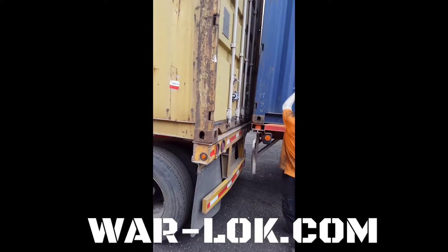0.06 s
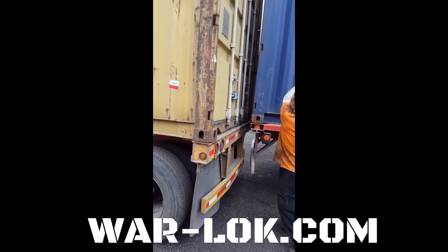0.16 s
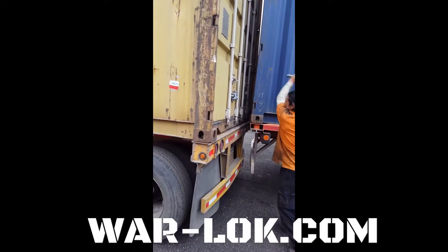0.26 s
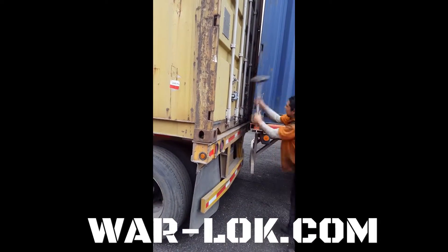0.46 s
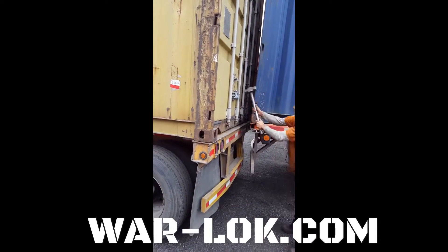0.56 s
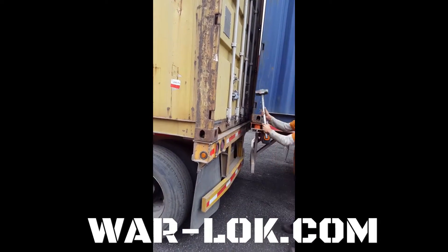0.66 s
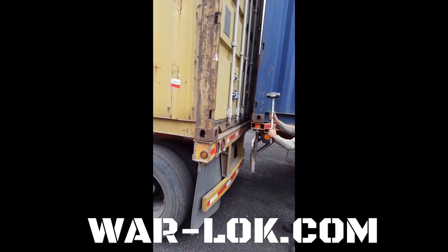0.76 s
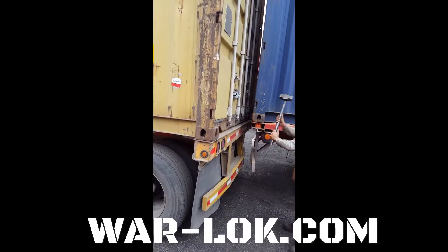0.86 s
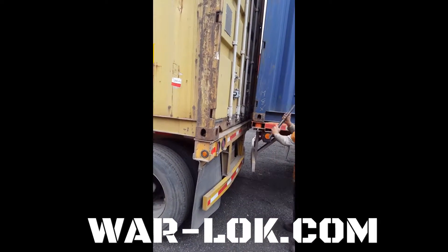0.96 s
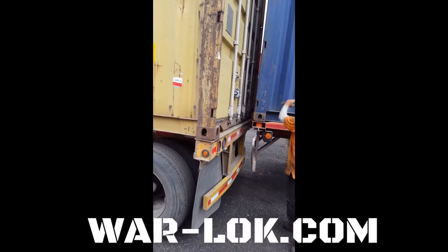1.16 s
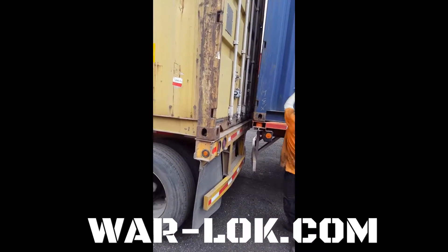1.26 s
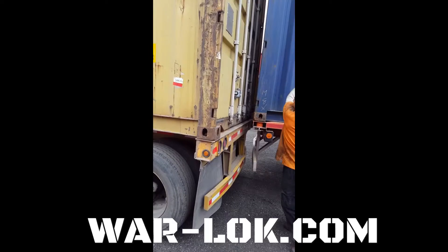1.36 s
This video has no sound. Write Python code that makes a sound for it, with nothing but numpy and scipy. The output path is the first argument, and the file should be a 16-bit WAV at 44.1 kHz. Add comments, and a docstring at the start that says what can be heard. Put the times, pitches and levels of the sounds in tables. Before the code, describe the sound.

A sledgehammer hits a steel container door once, a loud ringing clang over an idling engine.

```python
"""A container yard, a diesel engine idling. A sledgehammer hits the steel lock box on a door, once.
The box cracks and clangs, the door booms and rings behind it, and the container walls throw back a tail.
Faint scuffs of shoes and clothing and two thin steel squeaks sit around the swing.
The blow overloads the recorder, which clips and briefly ducks its gain."""
import sys
import numpy as np
from scipy import signal
from scipy.fft import rfft, irfft, next_fast_len
from scipy.io import wavfile

SR = 44100
rng = np.random.default_rng(int(sys.argv[2]) if len(sys.argv) > 2 else 0)


def log_audio(samples):
    """Write samples as a 16-bit WAV file to the path given in sys.argv[1]."""
    # one column per channel
    frames = np.atleast_2d(samples).T
    # limit to full scale, then quantise
    limited = np.clip(frames, -1, 1)
    pcm = np.round(limited * 32767).astype(np.int16)
    wavfile.write(sys.argv[1], SR, pcm)


N = 61739
BLOW_S = 0.6075  # the hammer lands

# Tone colour of the lock box's clang: f/Hz, relative level/dB
CLANG_COLOUR = [(100, -39), (400, -8.5), (900, -4), (2000, -3), (3000, -9), (4200, -13.5), (7000, -11),
                (9500, -17.5), (11500, -25.5), (15500, -22.5)]
# Decay of the clang: f/Hz, t60/s
CLANG_DECAY = [(300, 0.65), (2000, 0.33), (7000, 0.25), (15000, 0.28)]
# Stereo image of the clang: f/Hz, left-right correlation
CLANG_IMAGE = [(200, 0.22), (640, 0.0021), (1400, -0.6), (3100, -0.3), (12000, 0.039)]
# Tone colour of the door's boom: f/Hz, relative level/dB
BOOM_COLOUR = [(60, -40.5), (150, -22), (240, -0.5), (330, -9), (460, 1.5), (620, -9), (700, -11),
               (850, -8), (1300, -17.5), (3000, -24.5), (9000, -58)]
# Slapback of the boom off nearby containers: delay/s, level/dB, t60/s
SLAPBACKS = [(.057, -14, .25), (0.214, -20, 0.2)]
# Ringing modes of door and box: f/Hz, level/dB, t60/s
STEEL_MODES = [(257, -14.5, 0.66), (296, -21, 0.18), (339.6, -20, 1.3), (402, -20.5, 0.42),
               (458.8, -9, .55), (537.6, -13, 0.81), (554, -16, 0.39), (620, -20.5, 0.31), (752, -14.5, 1),
               (871.5, -16, 0.5), (1062, -23, 1.6), (1218, -34, 3), (1948, -30.5, 1.3), (2953, -20.5, 0.52),
               (8000, -27, .6)]
# Tone colour of the tail from the container walls: f/Hz, relative level/dB
TAIL_COLOUR = [(80, -29.5), (250, -5), (550, 1.5), (850, -6.5), (1250, -7), (1500, -12), (2300, -13),
               (3800, -23.5), (6000, -24), (7500, -24.5), (7750, -18), (8000, -21.5), (10500, -31),
               (13500, -42.5), (15500, -55)]
# Decay of that tail: f/Hz, t60/s
TAIL_DECAY = [(200, 1.4), (600, 1.16), (1200, 1.35), (2200, 0.82), (4000, 0.82), (8000, 0.64),
              (14000, 0.32)]
# Stereo image of distant sound: f/Hz, left-right correlation
FAR_IMAGE = [(60, .96), (130, 0.97), (290, 0.91), (640, 0.64), (1400, 0.022), (3100, 0.15), (12000, 0.078)]
# Pan of the whole blow: f/Hz, left minus right level/dB
BLOW_PAN = [(200, 1.5), (1200, -0.5), (2200, -1), (4500, 1.5), (8000, 1.5), (13000, 2.5)]
# Level of the engine as heard, its rumble ducked by the recorder just after the blow:
# t/s, relative rumble level/dB, relative clatter level/dB
ENGINE_LEVELS = [(0, -30.5, -35.5), (.11, -32, -38), (.21, -25, -36.5), (.34, -25, -35), (.48, -21, -34),
                 (.6, -24, -36), (.7, -28.5, -34), (.85, -25, -36), (.97, -23.5, -34), (1.1, -23.5, -36),
                 (1.25, -29, -38.5), (1.4, -29, -37.5)]
# Tone colour of the engine's low rumble: f/Hz, relative level/dB
RUMBLE_COLOUR = [(20, -35), (35, -23.5), (57, 0.5), (75, -5), (110, -0.5), (170, 3), (250, 4.5),
                 (330, -6.5), (450, -9), (900, -72.5)]
# Tone colour of the engine's midrange clatter: f/Hz, relative level/dB
CLATTER_COLOUR = [(150, -33), (300, 0), (410, -2.5), (600, -3.5), (900, -12.5), (1200, -17), (1600, -27.5),
                  (2400, -34), (3600, -46), (6000, -55), (9000, -65), (11000, -65.5), (15500, -61)]
# Scuffs around the swing: t/s, level/dB, t60/s
SCUFF_CUES = [(.212, -65.5, .15), (.413, -60, 0.35), (1.288, -64, 0.16)]
# Tone colour of a scuff: f/Hz, relative level/dB
SCUFF_COLOUR = [(2000, -10), (4500, 1.5), (6500, -9), (8300, 0), (9800, -3.5), (11000, -15.5),
                (15000, -21.5)]
# Steel squeaks before the blow: t/s, length/s, f/Hz, level/dB
SQUEAK_CUES = [(.26, 0.29, 2950, -69.5), (0.5, 0.06, 4180, -70)]


def lock_box():
    """The attack: a bright steel-on-steel crack over the box's crowded, quickly damped modes."""
    crack_hz, width_octaves = 7240, 1
    clang = amp(-0.5) * damped(noise(CLANG_COLOUR, CLANG_IMAGE), CLANG_DECAY)
    sizzle = bell_noise(lambda hz: np.log2((hz + 1) / crack_hz) / width_octaves)
    crack = amp(-3) * sizzle * fall(since(BLOW_S), t60=0.022)
    return rise(BLOW_S, rise_s=0.0005) * (clang + crack)


def door_boom():
    """The body: the blow spreads through the door as a low boom, and nearby containers slap it back."""
    build_s = 0.024
    direct = amp(0.5) * pulse(BLOW_S, build_s, t60=0.14)
    slaps = sum(amp(db) * pulse(BLOW_S + delay, build_s, t60) for delay, db, t60 in SLAPBACKS)
    return direct * noise(BOOM_COLOUR, FAR_IMAGE) + slaps * noise(BOOM_COLOUR, FAR_IMAGE)


def steel_ring():
    """The sustain: door and box ring on in clear modes, the higher ones wider in stereo."""
    wide_hz = 680  # from here up, left and right ring a quarter cycle apart
    t = since(BLOW_S)
    ring = np.zeros((2, N))
    for hz, db, t60 in STEEL_MODES:
        spread = min(hz / wide_hz, 1) * np.pi / 4 * rng.choice([-1, 1])
        phase = rng.uniform(0, 2 * np.pi) + np.array([[spread], [-spread]])
        ring += amp(db) * fall(t, t60) * np.sin(2 * np.pi * hz * t + phase)
    return ring * rise(BLOW_S, rise_s=0.0029)


def wall_tail():
    """The tail: the clang bounces between the steel walls, darkening as it dies."""
    tail = damped(noise(TAIL_COLOUR, FAR_IMAGE), TAIL_DECAY)
    return amp(-7.5) * tail * rise(BLOW_S, rise_s=0.018)


def engine():
    """The bed: a diesel idles out of sight, its firings blurred into a rumble with a slight throb."""
    firing_hz, throb_depth = 33.1, 0.1
    t = since(0)
    times, rumble_db, clatter_db = np.transpose(ENGINE_LEVELS)
    throb = 1 + throb_depth * np.sin(2 * np.pi * (firing_hz * t + rng.random()))
    rumble = amp(1.5 + np.interp(t, times, rumble_db)) * noise(RUMBLE_COLOUR, FAR_IMAGE)
    clatter = amp(4.5 + np.interp(t, times, clatter_db)) * noise(CLATTER_COLOUR, FAR_IMAGE)
    return throb * (rumble + clatter)


def scuffs():
    """Foley: shoes and clothing brush in short, faint hisses."""
    envelope = sum(amp(db) * pulse(start, rise_s=0.0074, t60=t60) for start, db, t60 in SCUFF_CUES)
    return envelope * noise(SCUFF_COLOUR, FAR_IMAGE)


def squeaks():
    """Rubbing steel gives thin, wavering squeaks, barely there."""
    width_hz = 35
    out = np.zeros((2, N))
    for start, length, centre_hz, db in SQUEAK_CUES:
        tone = bell_noise(lambda hz: (hz - centre_hz) / width_hz)
        progress = np.minimum(since(start) / length, 1)
        out += amp(db) * tone * np.sqrt(np.abs(np.sin(np.pi * progress)))
    return out


def amp(db):
    """Decibels to gain."""
    return 10 ** (np.asarray(db) / 20)


def unit(x):
    """Scale to rms 1."""
    return x / np.sqrt(np.mean(x ** 2) + 1e-20)


def along(points, hz):
    """Read a curve of (f/Hz, value) points on a log frequency axis."""
    freqs, values = np.transpose(points)
    return np.interp(np.log(hz + 1), np.log(freqs + 1), values)


def eq(x, response):
    """Shape x with a gain that depends on frequency."""
    size = next_fast_len(N + SR // 4)
    gain = response(np.fft.rfftfreq(size, 1 / SR))
    return irfft(rfft(x, size) * gain, size)[..., :N]


def noise(colour, image):
    """Stereo noise of rms 1 with a given tone colour and stereo image."""
    def mid_side_gains(hz):
        angle = np.arccos(np.clip(along(image, hz), -1, 1)) / 2
        return amp(along(colour, hz)) * [np.cos(angle), np.sin(angle)]
    mid, side = eq(rng.standard_normal((2, N)), mid_side_gains)
    return unit(np.array([mid + side, mid - side]))


def bell_noise(offset):
    """A bell-shaped band of stereo noise, rms 1; offset(hz) counts widths from its centre."""
    white = rng.standard_normal((2, N))
    return unit(eq(white, lambda hz: np.exp(-.5 * offset(hz) ** 2)))


def since(start):
    """Seconds since start, zero before it."""
    return np.maximum(np.arange(N) / SR - start, 0)


def rise(start, rise_s):
    """An attack from silence to 1."""
    return 1 - np.exp(-since(start) / rise_s)


def fall(t, t60):
    """Free decay, 60 dB down after t60 seconds."""
    return amp(-60 * t / t60)


def pulse(start, rise_s, t60):
    """An attack-decay envelope."""
    return rise(start, rise_s) * fall(since(start), t60)


def damped(x, decay):
    """From the blow on, each frequency dies at its own speed."""
    hz, t, bands = signal.stft(x, SR, nperseg=256)
    bands = bands * fall(np.maximum(t - BLOW_S, 0), along(decay, hz)[:, None])
    return signal.istft(bands, SR, nperseg=256)[1][:, :N]


def scene():
    """The mix: the blow and its tail over the engine, scuffs and squeaks."""
    sides = np.array([[.5], [-.5]])
    blow = lock_box() + door_boom() + steel_ring() + wall_tail()
    blow = eq(blow, lambda hz: amp(along(BLOW_PAN, hz) * sides))
    bed = engine() * amp(0.9 * sides)  # a touch to the left
    return blow + bed + scuffs() + squeaks()


def record(dry):
    """The overloaded recorder: a slow gain duck, clipping at full scale and a steep top cut."""
    threshold_db, duck_share, attack_s, release_s = -14, 0.3, 0.04, 0.2
    hardness, fade_s = 7, 0.004
    top_hz, edge_hz = 15750, 110
    t = since(0)
    step = 1 - np.exp(-1 / (attack_s * SR))
    smooth = lambda x: signal.lfilter([step], [1, step - 1], x)
    power = smooth(np.mean(dry ** 2, axis=0))
    over_db = np.maximum(10 * np.log10(power + 1e-12) - threshold_db, 0)
    release = np.exp(-t / release_s)
    held_db = np.maximum.accumulate(over_db / release) * release  # catch each peak, then let go
    ducked = dry * amp(-duck_share * smooth(held_db))
    clipped = ducked / (1 + np.abs(ducked) ** hardness) ** (1 / hardness)
    soft_ends = np.minimum(np.minimum(t, t[::-1]) / fade_s, 1)
    return eq(clipped * soft_ends, lambda hz: .5 - .5 * np.tanh((hz - top_hz) / edge_hz))


dry = scene()
out = record(dry)
log_audio(out)
```